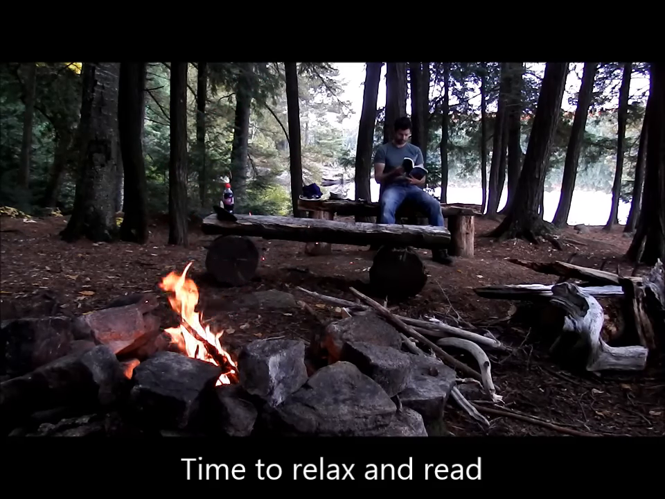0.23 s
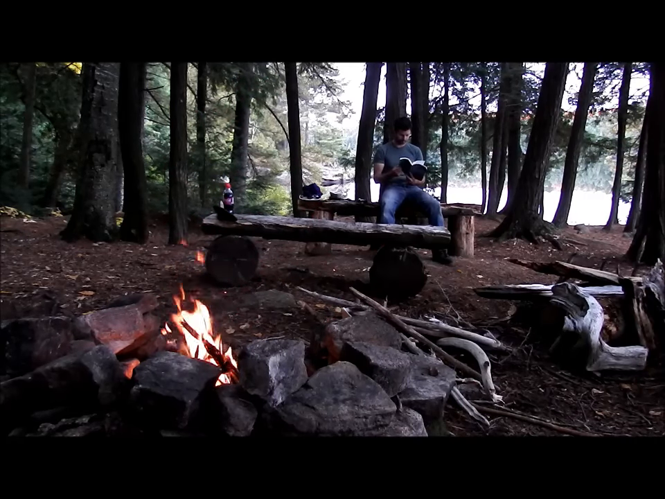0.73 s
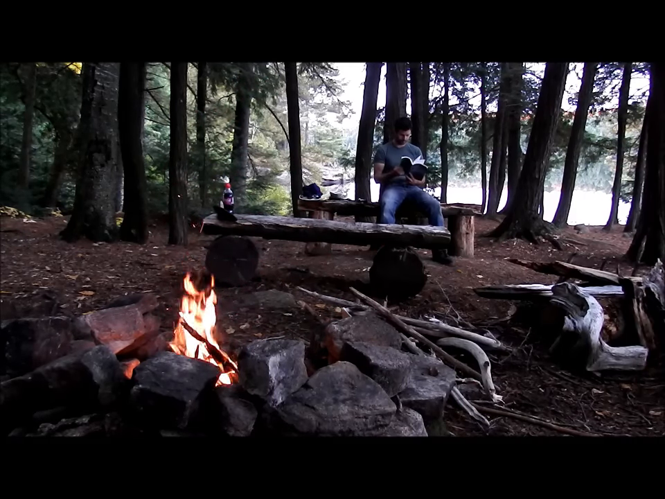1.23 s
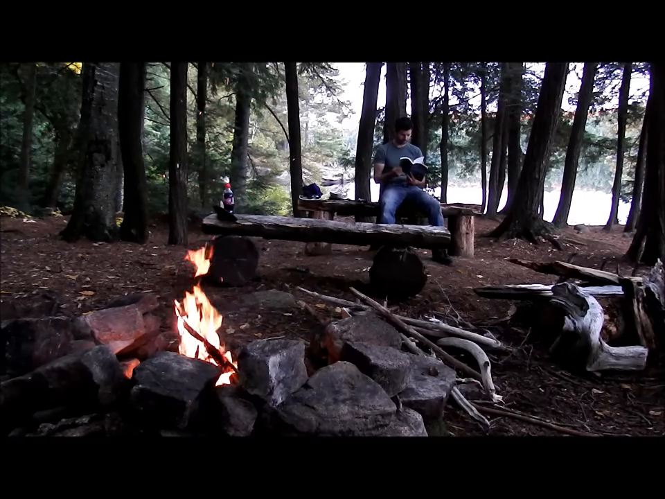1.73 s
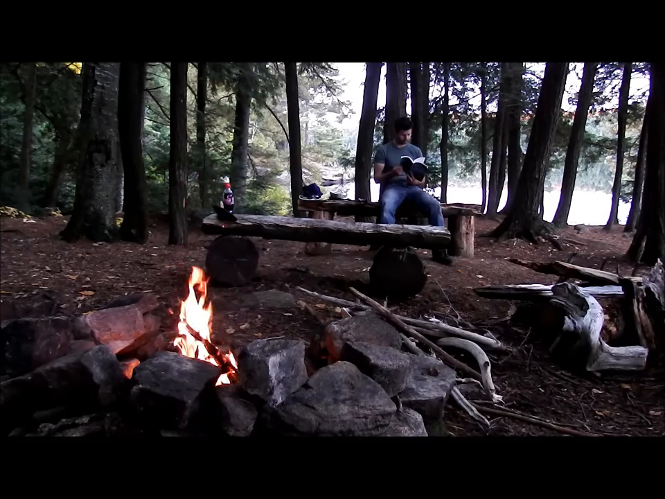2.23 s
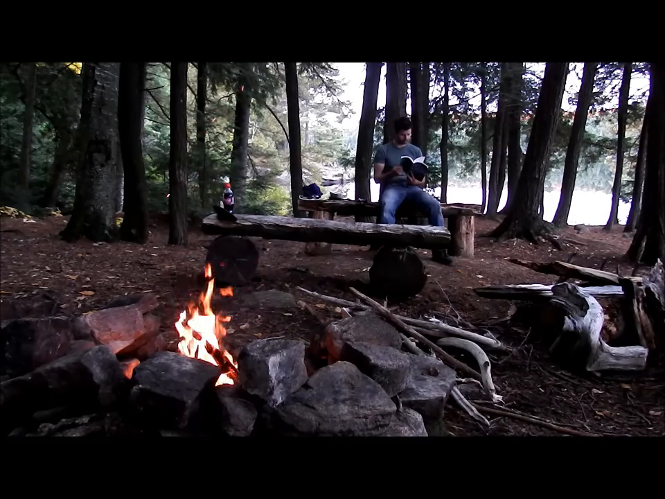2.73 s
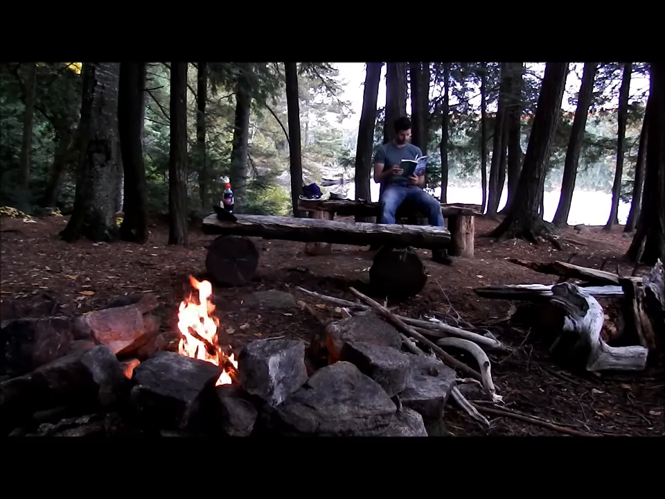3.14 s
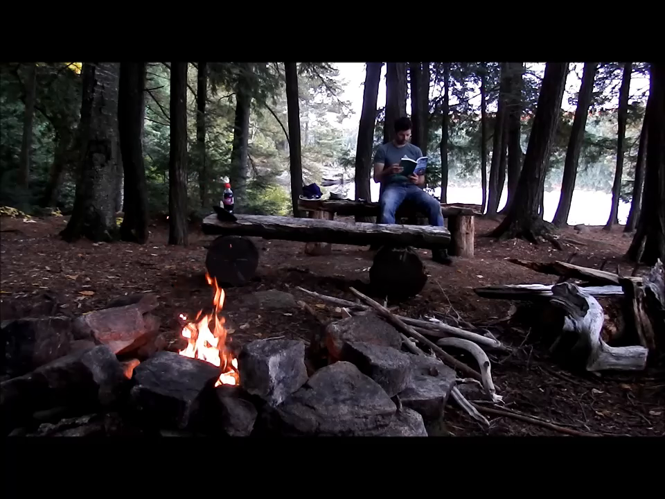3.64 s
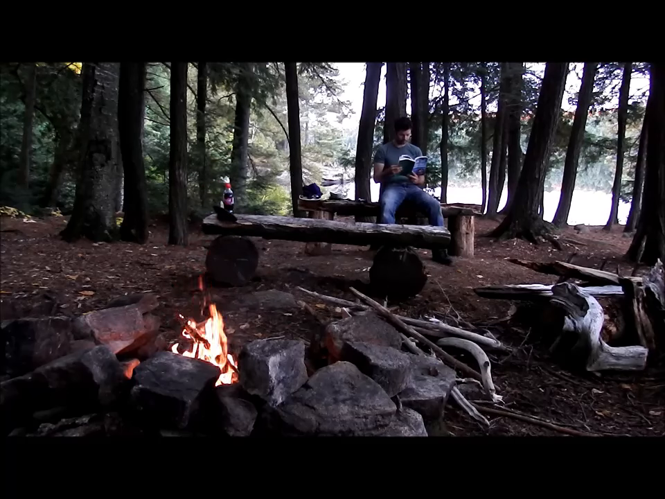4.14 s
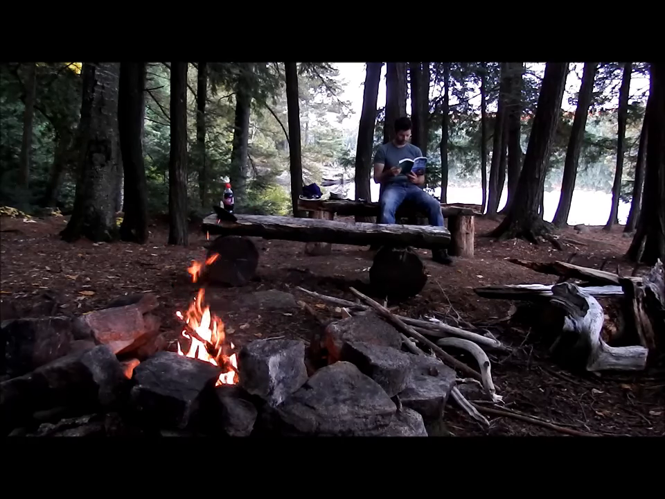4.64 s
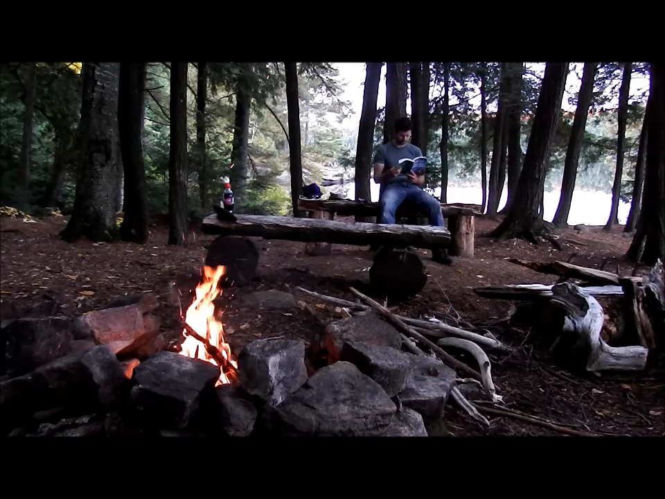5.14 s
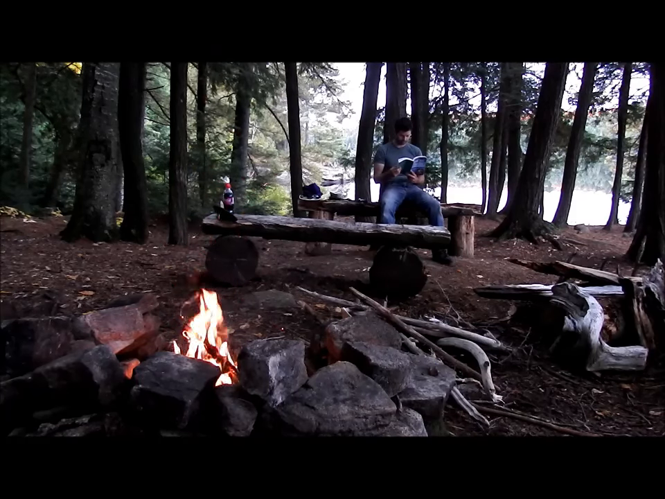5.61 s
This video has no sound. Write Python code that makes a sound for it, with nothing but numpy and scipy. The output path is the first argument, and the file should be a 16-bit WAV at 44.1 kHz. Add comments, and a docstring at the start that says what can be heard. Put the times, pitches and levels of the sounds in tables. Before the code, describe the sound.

A small wood fire burns in a stone ring in an open forest clearing, captured in stereo from a few metres. A very quiet, soft rush of flames and woods runs throughout, gently flickering, with dense tiny ember ticks. Light snaps open the scene; around 0.4 to 0.6 s charcoal crumbles in short runs of dull clicks and faint low gas puffs flutter. A firm pop at 0.8 s leads to the loudest, a sharp double crack near 0.95 s. Scattered snaps follow, with a busy bright cluster from 2.45 to 2.75 s. Things thin out from 2.9 to 3.7 s, with more splintery pops. Deeper, woody knocks strike at about 3.9, 4.3, 4.8 and 5.15 s, then a bright crack at 5.3 s. Strong pops leave short echoes among the trunks, under half a second. After a last faint tick near 5.4 s, only hush and ticking remain until an abrupt fade at 5.77 s.

```python
"""A small wood fire in a ring of stones among tall trees, a few metres from a pair of microphones.
From the start, shaped noise is the rush of fire and woods, and random ticks crackle in the embers.
Then steam pockets pop: each break rings its cavity, scatters off splinters and stones, and the forest replies.
The loudest pops begin near 0.9 s. From about 0.4 s charcoal crumbles in runs of clicks, and gas puffs
flutter as low noise with a swell and decay. All fades quickly to silence just before the end."""
import sys
import numpy as np
from scipy import signal
from scipy.fft import rfft, irfft, next_fast_len
from scipy.io import wavfile
from scipy.ndimage import uniform_filter1d

SR = 44100
rng = np.random.default_rng(int(sys.argv[2]) if len(sys.argv) > 2 else 0)


def generate_wav(signal):
    """Clip the signal to [-1, 1] and save it as 16-bit WAV at the path in sys.argv[1]."""
    frames = np.transpose(np.atleast_2d(signal))
    scaled = np.clip(frames, -1, 1) * 32767
    pcm = np.round(scaled).astype(np.int16)
    wavfile.write(sys.argv[1], SR, pcm)


N = 258855  # length in samples
HZ = abs(np.fft.fftfreq(2048, 1 / SR))  # frequency grid of the colour filters

# steady rush of flames and woods, relative: [f/Hz, level/dB]
RUSH_COLOUR = [(25, -49), (70, -39), (105, -23.5), (150, -7.5), (290, -0.5), (480, -3), (660, 1.5),
               (950, -5.5), (1300, -8), (2150, -7), (2700, -12), (4200, -11), (4900, -19), (9000, -18.5),
               (16000, -25)]
# left-right likeness of the rush at the microphones: [f/Hz, likeness 0 to 1]
RUSH_LIKENESS = [(60, 0.84), (300, 0.84), (700, 0.61), (1600, 0.41), (3600, 0.21), (6000, 0.077),
                 (15000, 0.14)]
# centres at which each tick gets its own random colour: [f/Hz]
TICK_TONE_HZ = [550, 1800, 3600, 8500]
# steam pockets bursting: [t/s, strength level/dB, pocket f/Hz, body level/dB, fizz level/dB,
# splintering level/dB, share sent into the forest level/dB]
POPS = [(.0337, -16, 4200, 11, 6, -3.5, 4), (.1669, -18.5, 1400, 13, -18, -5, 13.5),
        (.2559, -30, 4300, 19, 19.5, -15, 4), (.494, -14, 1950, 13.5, 1, -4, 4.5),
        (.529, -11, 3950, 8.5, -12, -3, 4.5), (.536, -13, 3700, 5.5, 9, -2, -10),
        (.7034, -6.5, 2150, 3, -4, -2, -1), (.725, -20.5, 2400, 20.5, 2, -6, -4.5),
        (.8194, 2, 3900, 1, -6, -6, -0.5), (.9428, 12.5, 3300, 0.5, -8.5, -12, -1),
        (.957, 12.5, 3550, -0.5, -4.5, 1.5, -5), (1.0593, -13, 2320, 9, -7, 0, 4),
        (1.126, -21, 1780, 7, -2, -5, 14), (1.2704, -3, 2170, 5.5, 5.5, -6, -.5),
        (1.3179, -14, 2500, 14, -11, -3.5, 0), (1.3316, -16, 2400, 4, -13, 4, 5),
        (1.3989, 1.5, 1780, 0.5, 8, 3, 3), (1.495, -26, 3300, 17, 13, -3, -2),
        (1.6877, -5.5, 3900, 9.5, 3, -8, -1), (1.7266, -16.5, 1080, 7, -7, -8, -5),
        (1.8739, 1, 1920, -4.5, 5.5, -8.5, -1.5), (2.143, -1, 2140, 0, 3.5, 4, 3.5),
        (2.2846, -27.5, 2170, 15.5, 10, 12, 4), (2.4062, -24.5, 4270, 11.5, 6, -5, 3),
        (2.462, 1.5, 1000, 2, -.5, 2.5, 0), (2.503, -16.5, 4200, 1, 3, -16, -1),
        (2.5337, 6, 4000, 0.5, -0.5, -3.5, -4.5), (2.5431, 1.5, 2280, 0, -3.5, 10, 4.5),
        (2.68, 2.5, 2150, 3, 7, 0, 3), (2.69, 3.5, 3950, 5.5, 10.5, -2.5, 3.5),
        (2.7607, -14.5, 2400, 9.5, 3, -1, 12), (2.933, -11, 3950, 13, -8, 8, 6.5),
        (3.1934, -6.5, 1900, 13.5, 8.5, 9.5, 6), (3.229, -9, 1790, 6.5, -6, -7, 6),
        (3.6482, -10, 1850, 10.5, 6, 11, 3), (3.676, -15.5, 1900, 8, -11, 14, 8),
        (3.6843, -15, 1750, 4, -16, 4, 1), (3.7252, -2.5, 2050, 3.5, 2, -2, 2.5),
        (3.8799, 7.5, 830, -2, 2.5, -4.5, -3.5), (4.1685, -23, 4100, 21, 0, 11, 8),
        (4.2899, -17, 3100, 15, 0, 2, 11.5), (4.297, -19.5, 1880, 0, 14.5, 7, 4),
        (4.3289, 8.5, 885, 2, -4.5, -2.5, -5), (4.4449, -1.5, 1680, 4.5, 6.5, 0, 3.5),
        (4.641, -17, 2450, 10, 0, 7, 9), (4.6752, -7.5, 1520, -6.5, -4.5, -7.5, -0.5),
        (4.7245, -7, 3130, 3, -10, -5, -4.5), (4.803, 11, 820, 0, -6, -2.5, -8),
        (4.9127, -20, 3200, 1, 10, 1, -1), (4.9209, -22.5, 1870, 11.5, -7, -3, -1),
        (5.0038, -12, 3180, -0.5, 12.5, -7, -3.5), (5.1438, 5, 930, -8, 11.5, -4, -1),
        (5.231, -8, 2300, 12, 5, 6, 5.5), (5.2766, 8.5, 4000, -4, 3, -5.5, -1),
        (5.38, -21.5, 1720, -4, -4.5, 6, 4)]
# a thick piece of wood adds body: [f/Hz, level/dB per dB of body]
BODY_COLOUR = [(550, 1), (1800, 0)]
# a sharper break adds fizz: [f/Hz, level/dB per dB of fizz]
FIZZ_COLOUR = [(1800, 0), (3600, 0.4), (8500, 1)]
# colour of a pop on the direct path: [f/Hz, level/dB]
CRACK_COLOUR = [(60, -48), (260, -17.5), (500, -13), (900, -10.5), (1400, -5.5), (2000, 2.5), (2650, -4.6),
                (3400, -1.66), (4200, -1.74), (4800, -17), (6100, -35), (7400, -20), (8700, -18.5),
                (15500, -43)]
# reflections off near stones, logs and trunks: [delay t/s, level/dB]
NEAR_ECHOES = [(.0048, -24), (0.012, -24.5), (.0152, -36), (.0159, -25), (.0262, -30)]
# the left microphone hears the fire first: [f/Hz, phase lag of the right/rad]
LEFT_LEAD = [(10, 0.018), (1800, 0.013), (3700, 0.42), (8500, 0.83), (13000, .2)]
# colour of the sound that the trees send back: [f/Hz, level/dB]
FOREST_COLOUR = [(100, -41.5), (500, -14), (1400, -10.5), (2100, -5.5), (2600, -4.5), (3200, -1.5),
                 (4000, 0), (5100, -16), (6500, -17.5), (9000, -17.5), (12000, -22), (15500, -32)]
# time the forest takes to die by 60 dB: [f/Hz, t/s]
FOREST_T60 = [(300, 0.31), (2000, 0.39), (3700, 0.45), (8000, 0.42), (15000, 0.1)]
# left-right likeness of the forest at the microphones: [f/Hz, likeness 0 to 1]
FOREST_LIKENESS = [(200, 0.62), (1800, 0.88), (3600, 0.99), (6000, 0.28), (9000, 0.27), (15000, .55)]
# crumbling charcoal: [t/s, strength level/dB, length t/s]
CRUMBLES = [(0.371, -17.5, 0.022), (0.422, -19, 0.0085), (0.469, -25.5, .008), (0.558, -16.5, .005),
            (1.56, -19.5, 0.036), (3.668, -21, 0.014), (3.838, -17.5, 0.01), (4.23, -17.5, 0.03)]
# puffs of burning gas: [t/s, peak rms level/dB, decay t/s]
PUFFS = [(0.419, -61, 0.014), (.722, -55.5, 0.0082), (.943, -55, 0.015), (1.284, -50, 0.014),
         (1.395, -48.5, 0.0061), (1.679, -62, 0.016), (5.233, -51.5, .006)]
# left minus right microphone: [f/Hz, level/dB]
MIC_BALANCE = [(4400, -1.7), (8000, -0.1), (15000, 0.5)]
# narrow dips of the microphones: [f/Hz, width f/Hz]
MIC_DIPS = [(218, 52), (1110, 104)]

RUSH_DB = -60.5  # rms over both channels, ahead of the microphone colour
POCKET_RING_DB = 6
CRUMBLE_HZ, PUFF_HZ = 1880, 290
END_S, EDGE_HZ = 5.772, 16000  # time of silence, upper band limit


def gain_of(db):
    """Decibels to amplitude."""
    return 10 ** (np.asarray(db) / 20)


def evened(x):
    """Scales to rms 1."""
    return x / np.sqrt(np.mean(x ** 2) + 1e-20)


def read(points, hz):
    """Joins (Hz, value) points on a log-frequency axis."""
    f, value = np.transpose(points)
    return np.interp(np.log(hz + 1), np.log(f + 1), value)


def add(mix, s, sound):
    """Mixes a sound in at time s."""
    part = mix[max(round(s * SR), 0):][:len(sound)]
    part += sound[:len(part)]


def causal(db, size=1024):
    """Minimum-phase impulse response whose colour is db, given at the frequencies HZ."""
    log_spectrum = np.conj(signal.hilbert(np.log(gain_of(db))))
    return np.fft.ifft(np.exp(log_spectrum)).real[:size]


def pair(a, b, likeness):
    """Two channels of the given likeness from two unrelated spectra."""
    same = np.clip(likeness, -1, 1)
    return np.array([a, same * a + np.sqrt(1 - same ** 2) * b])


def rush(patchy_db=0.7, flicker_db=-0.67, flame_hz=900):
    """Soft noise with drifting patches; its low part flickers with the flames."""
    frames, hz = N // 256 + 5, np.fft.rfftfreq(1024, 1 / SR)
    a, b, c, d, patches = rng.standard_normal((frames, 513, 5)).T
    patches = uniform_filter1d(patches, size=12, axis=0)  # smooth across frequency
    patches = evened(uniform_filter1d(patches, size=10, axis=1))  # and across time
    flicker = evened(uniform_filter1d(rng.standard_normal(frames), size=14))
    noise = pair(a + 1j * b, c + 1j * d, read(RUSH_LIKENESS, hz)[:, None])
    flames_db = flicker_db * flicker / (1 + hz[:, None] / flame_hz)
    level_db = read(RUSH_COLOUR, hz)[:, None] + patchy_db * patches + flames_db
    wave = signal.istft(noise * gain_of(level_db), nperseg=1024, noverlap=768)[1]
    return gain_of(RUSH_DB) * evened(wave[:, :N])


def burst(splinter_db, base_decay_s=0.002, delay_s=0.00051, grain=1.1, size=512):
    """One sudden break, then a few milliseconds of tearing fibres and scatter among the logs."""
    t = np.arange(size) / SR
    draw = rng.standard_normal(size)
    grains = np.sign(draw) * abs(draw) ** grain
    linger_s = base_decay_s * gain_of(0.4 * splinter_db)  # more splinters take longer
    scatter = grains * np.exp(-t / linger_s) * np.clip(t / delay_s - .5, 0, 1)
    # what counts is the scatter's strength where the wood rings loudest
    band = signal.butter(2, [1300, 4500], "bandpass", fs=SR)
    heard_scatter, heard_break = signal.lfilter(*band, [scatter, t == 0])
    wave = gain_of(splinter_db) * scatter * np.linalg.norm(heard_break) / np.linalg.norm(heard_scatter)
    wave[0] -= 1  # the break itself
    return wave / np.sqrt(1 + gain_of(splinter_db) ** 2)


def ticks(per_s=40, tick_db=-35, spread_db=0.5, colour_db=5, count=300):
    """Tiny random crackles in the embers, each of a different colour."""
    out = np.zeros(N)
    times = np.cumsum(rng.exponential(1 / per_s, count))
    sizes = np.minimum(rng.exponential(1, count), 2)
    tones = rng.standard_normal((count, len(TICK_TONE_HZ)))
    for s, size, tone in zip(times, sizes, tones):
        tone_points = list(zip(TICK_TONE_HZ, colour_db * np.clip(tone, -2, 1)))
        level_db = tick_db + spread_db * size + read(tone_points, HZ)
        add(out, s, np.convolve(burst(0), causal(level_db, size=128)))
    return out


def pocket(hz, ring_db, width=0.22):
    """The broad resonance of a small cavity in the wood, in dB."""
    return ring_db / (1 + ((HZ - hz) / (width * hz)) ** 2)


def pops(count=4):
    """Each burst rings its own pocket; gives the sound towards the microphones and that sent into the trees."""
    near, far = np.zeros(N), np.zeros((count, N))
    for k, (s, db, hz, body_db, fizz_db, splinter_db, forest_db) in enumerate(POPS):
        colour_db = pocket(hz, POCKET_RING_DB)
        colour_db = colour_db + body_db * read(BODY_COLOUR, HZ) + fizz_db * read(FIZZ_COLOUR, HZ)
        add(near, s, np.convolve(burst(splinter_db), causal(db + colour_db)))
        # summed over all directions the colour of a pop evens out
        add(far[k % count], s, causal(db + forest_db + colour_db / 2))
    return near, far


def direct(x, crack_db=0.37):
    """The straight path and a few near echoes, reaching the two microphones slightly out of step."""
    straight = signal.oaconvolve(x, causal(crack_db + read(CRACK_COLOUR, HZ)))[:N]
    left = straight.copy()
    for delay_s, db in NEAR_ECHOES:
        add(left, delay_s, gain_of(db) * straight)
    size = next_fast_len(N)
    lag = np.exp(-1j * read(LEFT_LEAD, np.fft.rfftfreq(size, 1 / SR)))
    right = irfft(rfft(left, size) * lag, size)[:N]
    return np.array([left, right])


def forest(x, wet_db=-14, build_s=0.0028, trunks_db=2.0):
    """Countless small reflections, bunched where a trunk stands, each band dying at its own speed."""
    hz, t, noise = signal.stft(rng.standard_normal((2, SR // 2)), SR, nperseg=128)
    decay = gain_of(-60 * t / read(FOREST_T60, hz)[:, None])
    reflections = pair(*noise, read(FOREST_LIKENESS, hz)[:, None]) * decay
    bunches = gain_of(trunks_db * rng.standard_normal(len(t)))
    build = 1 - np.exp(-t / build_s)
    tail = signal.istft(reflections * bunches * build, SR, nperseg=128)[1]
    coloured = signal.oaconvolve(x, causal(wet_db + read(FOREST_COLOUR, HZ)))[:N]
    return signal.fftconvolve(coloured[None], tail / np.linalg.norm(tail[0]), axes=1)[:, :N]


def crumbles(grains_per_s=900, ring_db=4, dull_db=-3):
    """Charcoal gives way in a short run of tiny dull clicks."""
    out = np.zeros(N)
    dulling = read([(CRUMBLE_HZ, 0), (2 * CRUMBLE_HZ, dull_db)], HZ)
    colour = causal(pocket(CRUMBLE_HZ, ring_db) + dulling)
    for s, db, length_s in CRUMBLES:
        size, chance = rng.standard_normal(SR // 10), rng.random(SR // 10)
        t = np.arange(len(size)) / SR
        clicks = size * (chance < grains_per_s / SR) * (t < length_s)
        clicks = clicks / (np.linalg.norm(clicks) + 1e-9)
        add(out, s, gain_of(db) * np.convolve(clicks, colour))
    return out


def puffs(rise_s=0.0084, width=0.49):
    """Gas let out of the wood flares with a short low flutter."""
    out, t = np.zeros(N), np.arange(SR // 6) / SR
    band = signal.butter(3, [PUFF_HZ / (1 + width), PUFF_HZ * (1 + width)], "bandpass", fs=SR)
    for s, db, decay_s in PUFFS:
        shape = (1 - np.exp(-t / rise_s)) * np.exp(-t / decay_s)
        flutter = signal.lfilter(*band, rng.standard_normal(len(t)) * shape)
        level = np.linalg.norm(shape / shape.max()) / np.linalg.norm(flutter)
        add(out, s, gain_of(db) * flutter * level)
    return out


def scene():
    """Pops, crumbles and ticks with their echoes, over the flames."""
    near, far = pops()
    embers = ticks() + crumbles()
    echoes = sum(forest(direction + embers / 2) for direction in far)
    return direct(near + embers) + echoes + puffs() + rush()


def record(dry):
    """The microphones' balance and dips, a quick fade to silence, and the band limit."""
    half_db = read(MIC_BALANCE, HZ) / 2
    out = np.array([signal.oaconvolve(x, causal(db))[:N] for x, db in zip(dry, [half_db, -half_db])])
    for hz, width in MIC_DIPS:
        out = signal.lfilter(*signal.iirnotch(hz, hz / width, fs=SR), out)
    out = out * np.clip((END_S - np.arange(N) / SR) / .004, 0, 1)  # 4 ms fade
    lowpass = signal.firwin(511, EDGE_HZ, window=("kaiser", 9), fs=SR)
    return signal.oaconvolve(out, lowpass[None], "same")


dry = scene()
out = record(dry)
generate_wav(out)
```